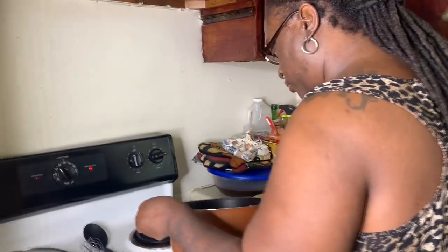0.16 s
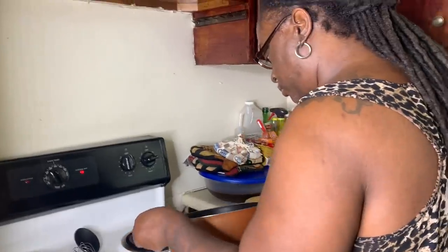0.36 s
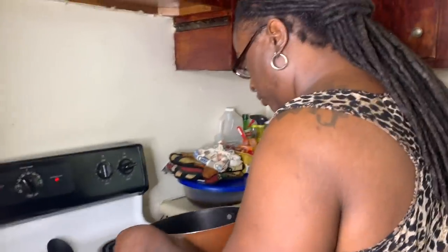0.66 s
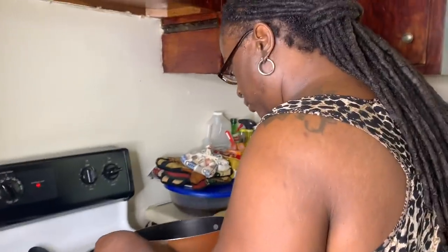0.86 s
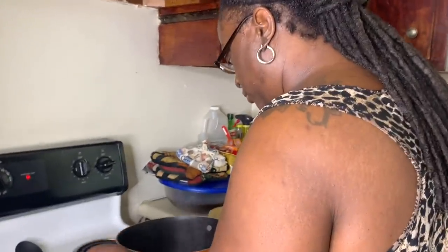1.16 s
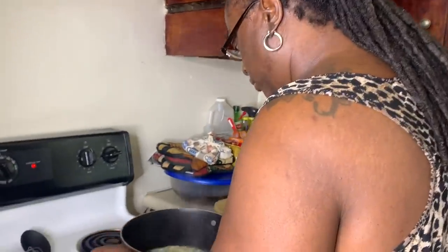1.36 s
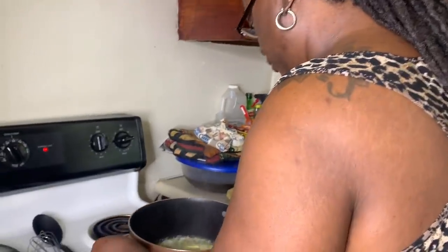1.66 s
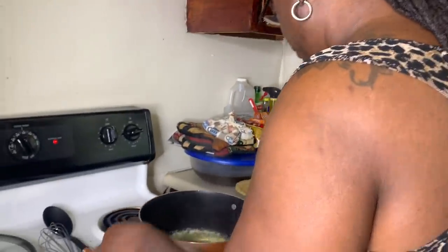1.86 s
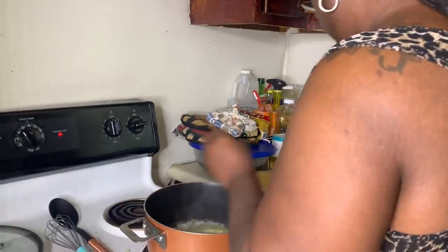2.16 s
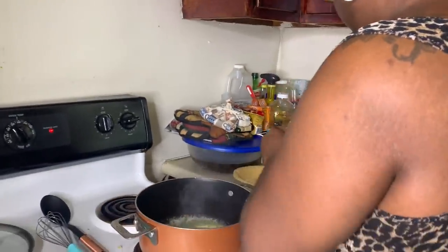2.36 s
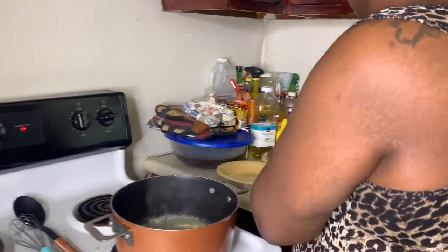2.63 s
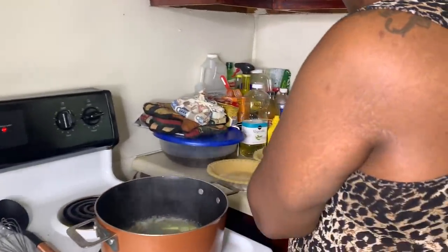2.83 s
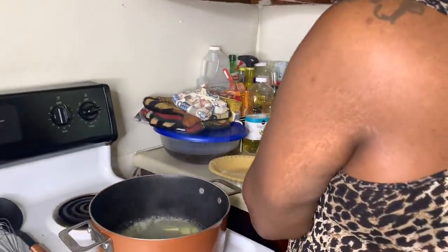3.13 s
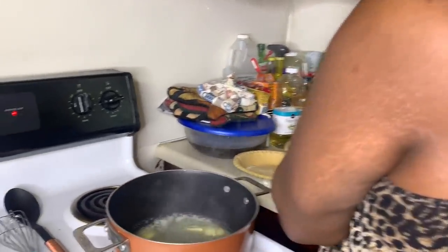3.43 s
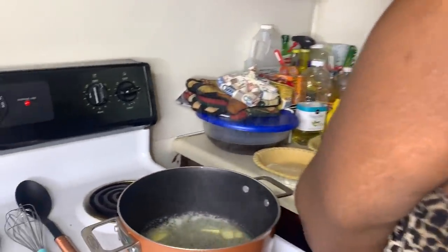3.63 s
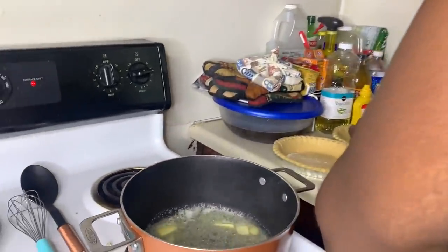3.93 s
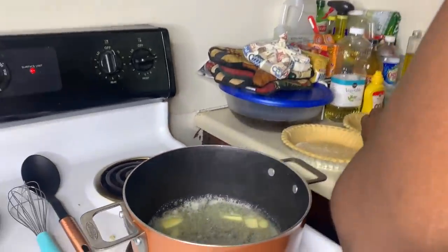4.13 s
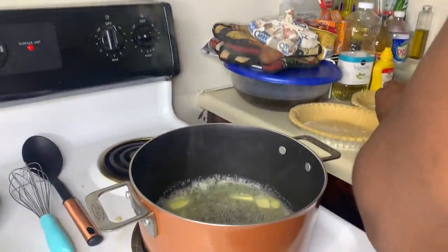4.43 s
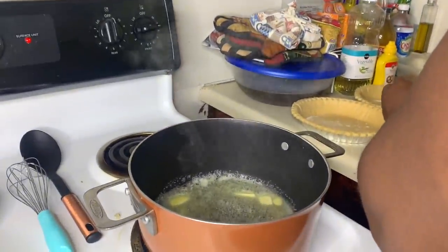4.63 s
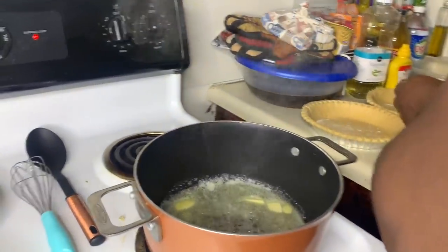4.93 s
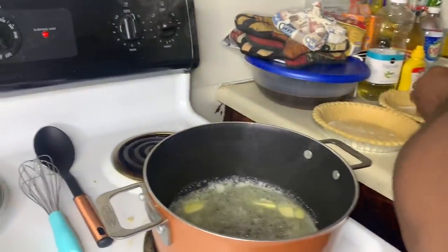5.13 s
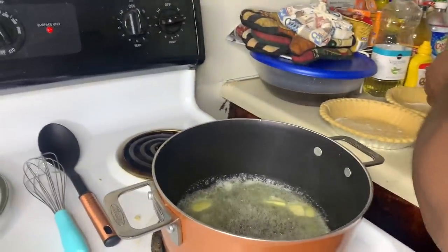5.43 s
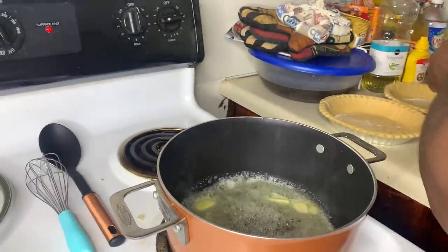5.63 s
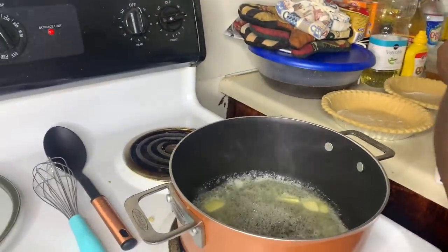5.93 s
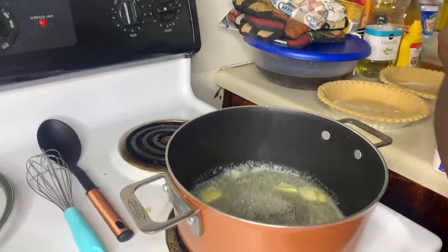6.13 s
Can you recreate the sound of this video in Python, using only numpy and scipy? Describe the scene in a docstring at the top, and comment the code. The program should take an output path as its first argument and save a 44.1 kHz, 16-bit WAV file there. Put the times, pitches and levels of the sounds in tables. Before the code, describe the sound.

Butter sizzles throughout, a dense bright hiss of tiny bubbles with a hollow ringing from the pot, over low appliance hum and soft air rush in a small kitchen. At first the hiss is slightly coarser, building and settling by about 1 second. At 1.4 a utensil touches the stove top, then lands harder at 1.5 with a woody, metallic knock and short low panel note. A tiny tap comes near 2.6, faint dull ticks around 3.8 to 4.25. From roughly 4 seconds the pot seems closer: individual crackles stand out and a low burble grows. At 4.5 a hard dish clatters sharply onto the counter, ringing bright for about a tenth of a second. At 5.0 a lighter object rattles down, duller and quieter. Small ticks at 5.2, 5.65, 5.8 and 6.1 mingle with spitting bubbles, the strongest at 6.0, until it stops near 6.3.

```python
"""Butter sizzling on a kitchen stove

Butter foams in a pot on an electric stove in a small kitchen, an arm's length from a microphone pair.
Tiny steam bubbles are random clicks coloured to a hiss; coarser ones ring the pot, and larger ones spit.
A utensil on the stove top, then a dish and a lighter thing on the counter, are struck resonances.
Appliance hum is wavering sines over low noise."""
import sys
import numpy as np
from scipy import signal
from scipy.fft import rfft, irfft, next_fast_len
from scipy.io import wavfile
from scipy.ndimage import uniform_filter1d

SR = 44100
rng = np.random.default_rng(int(sys.argv[2]) if len(sys.argv) > 2 else 0)


def wrap_up_sound(samples):
    """Save the sound to the file named by the first command line argument, as 16-bit audio."""
    columns = np.atleast_2d(samples).T
    # keep every value between -1 and 1, then stretch to whole-number steps
    tamed = np.clip(columns, -1, 1)
    steps = np.round(tamed * 32767).astype(np.int16)
    wavfile.write(sys.argv[1], SR, steps)


N = 276927
TIME = np.arange(N) / SR
SLOW_TIME = TIME[::256]  # coarse steps for slow changes
FFT_SIZE = 2 * next_fast_len(N // 2 + 2048)  # room for filter tails
FFT_HZ = np.fft.rfftfreq(FFT_SIZE, 1 / SR)


def gain_of(db):
    """Turns decibels into an amplitude factor."""
    return 10 ** (np.asarray(db) / 20)


def evened(x):
    """Scales to an rms of 1."""
    return x / np.sqrt(np.mean(x ** 2) + 1e-20)


def read(points, hz):
    """Reads a spectrum table, joined on a log-frequency axis."""
    f, value = np.transpose(points)
    return np.interp(np.log(hz + 1), np.log(f + 1), value)


def follow(rows, t):
    """Reads a two-column curve table at the times t."""
    s, value = np.transpose(rows)
    return np.interp(t, s, value)


def add(mix, s, sound):
    """Places a sound at s seconds, cut at the end of the mix."""
    part = mix[:, round(s * SR):][:, :sound.shape[-1]]
    part += sound[..., :part.shape[1]]


def drift(t, rate):
    """Chance drift of rms 1: sines of random phase, slower ones stronger, up to rate cycles a second."""
    total = 0
    for f in rate * np.geomspace(1 / 10, 1, 12):
        total = total + np.sin(2 * np.pi * (f * t + rng.random())) / np.sqrt(f)
    return evened(total)


def causal(db):
    """The minimum-phase response with this gain, which rings only after the blow."""
    log_gain = np.log(gain_of(np.r_[db, db[-2:0:-1]]))
    return np.exp(np.conj(signal.hilbert(log_gain)))[:len(db)]


# closeness to the stove as the cook steps aside, 0 afar and 1 close: (time [s], closeness [share])
CLOSENESS = [(0, 0.11), (3.3, 0.032), (4.3, 1.06), (5.2, 0.97), (5.7, 1.22), (6.28, 1.1)]


def near_gain(far_db, near_db):
    """The gain of a layer that changes by near_db as closeness goes from 0 to 1."""
    return gain_of(far_db + near_db * follow(CLOSENESS, TIME))


# likeness of the left and right ports: (frequency [Hz], correlation)
PORT_LIKENESS = [(60, 0.6), (250, 0.97), (500, 0.68), (800, 0.1), (1100, .6), (1400, 0.39), (2000, 0.05),
                 (2800, 0.34), (4000, 0.28), (5300, 0.25), (6400, 0.47), (7300, 0.083), (8800, 0.56),
                 (10200, 0.95), (13400, 1)]
# level of the left port over the right: (frequency [Hz], difference [dB])
PORT_BALANCE = [(200, 0), (700, -0.5), (1400, -2), (2500, 0.6), (3400, 1.3), (4700, -2), (5750, -5.5),
                (7600, -0.3), (8300, -4.5), (10000, -0.5), (13000, 0)]
# phase lead of the left port: (frequency [Hz], lead [rad])
PORT_LEAD = [(60, 0), (600, -.35), (950, .8), (1400, .55), (2000, -.3), (2800, 1.7), (3900, .65), (5300, 2),
             (6200, .4), (6900, .8), (7700, -1.6), (8700, -3.1), (10200, -6.3), (11900, -9.4),
             (14700, -15.3)]


def ports(z, hz):
    """Two unrelated spectra become a microphone pair: partly alike, one port ahead of the other."""
    same = np.clip(read(PORT_LIKENESS, hz), -1, 1)
    mid = z[0] * np.sqrt((1 + same) / 2)
    side = z[1] * np.sqrt((1 - same) / 2)
    # each port takes half the difference
    lean = gain_of(read(PORT_BALANCE, hz) / 2) * np.exp(.5j * read(PORT_LEAD, hz))
    return np.array([(mid + side) * lean, (mid - side) / lean])


def coloured(x, spectrum):
    """Two signals pass through a spectrum and reach the microphone pair at rms 1."""
    response = causal(read(spectrum, FFT_HZ))
    return evened(irfft(ports(rfft(x, FFT_SIZE), FFT_HZ) * response)[:, :N])


def bursts(per_s, spread_db):
    """Bubble bursts are single-sample clicks at random moments, most small and a few large."""
    size = gain_of(spread_db * np.minimum(rng.exponential(1, N), 4))
    happens = rng.random(N) < per_s / SR
    sign = rng.choice([-1., 1.], (2, N))
    return evened(sign * rng.random((2, N)) * size * happens)


# appliance hum from mains and motors, under the room:
# (frequency [Hz], rms level afar [dB], gain close to the stove [dB], waver [dB rms])
HUM_TONES = [(58.8, -51, 3.5, -0.3), (118.9, -55.5, 0, 2.5), (141.9, -51.5, 1, 1.7), (277.2, -60, -1, 1.5),
             (447, -58.5, -7, 3), (656, -69.5, -16, 2)]
# colour of the low rush of air: (frequency [Hz], relative density [dB per Hz])
AIR_SPECTRUM = [(20, -35), (45, -2), (60, -10), (80, -6), (105, -4), (150, 1), (270, -1), (370, -6.5),
                (450, -3), (650, -11), (800, -15), (1400, -18), (3000, -31.5), (15000, -49)]
# level of that rush at the microphone: (time [s], level [dB])
AIR_LEVEL = [(0, -48), (0.8, -48.5), (2.0, -48.5), (2.8, -49.5), (3.25, -51), (3.8, -49.5), (4.4, -50),
             (4.8, -52.5), (5.15, -49), (5.7, -47.5), (6.28, -50.5)]


def kitchen(wander_turns=0.073):
    """Mains and motors hum as sines of drifting phase and level, over a low rush of air from noise."""
    hum = 0
    for hz, far_db, near_db, waver_db in HUM_TONES:
        # the second tone wanders by wander_turns, the others in proportion to pitch
        wander = wander_turns * hz / HUM_TONES[1][0]
        turns = hz * TIME + wander * np.interp(TIME, SLOW_TIME, drift(SLOW_TIME, rate=3))
        waver = gain_of(waver_db * np.interp(TIME, SLOW_TIME, drift(SLOW_TIME, rate=13)))
        hum = hum + np.sqrt(2) * near_gain(far_db, near_db) * waver * np.sin(2 * np.pi * turns)
    air = coloured(rng.standard_normal((2, N)), AIR_SPECTRUM)
    return hum + gain_of(follow(AIR_LEVEL, TIME)) * air


# bursting bubbles as the pot colours them: (frequency [Hz], relative density [dB per Hz])
FOAM_SPECTRUM = [(300, -18), (1300, -20), (1900, -14.5), (2400, -7), (3000, -2), (3750, 1), (4400, 0.5),
                 (5100, -4), (6300, -5), (7800, -8), (8300, -4), (9700, -9), (12000, -11), (13500, -15.5),
                 (14500, -22)]
# single bubbles against the dense hiss: (level afar [dB], gain close to the stove [dB])
CRACKLE_LEVEL = (-16.5, 12.5)
# treble of the hiss, before its weight by frequency: (time [s], level [dB])
HISS_TREBLE = [(0, 7), (0.7, 10), (1.3, 3), (1.65, 0), (2.45, -3.5), (2.85, 1), (3.25, -4.5), (3.65, 1.5),
               (6.28, -1.5)]
# middle range of the hiss, in full from 3.8 to 6.5 kHz: (time [s], level [dB])
HISS_MIDDLE = [(0, -0.5), (0.7, 0.1), (1.4, -0.5), (2.3, 1.6), (2.9, -2), (3.7, 0.5), (4.3, -0.1),
               (4.9, -.7), (5.5, 1), (6.28, -2.1)]
# the boil builds up at first, then holds
BOIL_DB, BUILD_DB, BUILD_S = -37.5, 7.5, 0.78
# the share of coarse bubbles falls steadily as the butter heats (before its weight by frequency)
COARSE_DB, COARSE_FALL_DB_PER_S = 2.0, 1.26
# the young foam is coarser still, until it settles
YOUNG_DB, SETTLE_AT_S, SETTLE_TAKES_S = 2.5, 0.98, 0.08


def sizzle(patchy_db=1.0, ripple_db=2.0, flutter_db=0.54):
    """A dense foam of bursts plus nearer single ones; the balance of bands shifts as the butter heats."""
    foam = bursts(per_s=30000, spread_db=0.5)
    single = bursts(per_s=900, spread_db=2.5)
    clear = near_gain(*CRACKLE_LEVEL)
    hiss = coloured((foam + clear * single) / np.sqrt(1 + clear ** 2), FOAM_SPECTRUM)
    hz, t, z = signal.stft(hiss, SR, nperseg=512, noverlap=384)

    boil_db = BOIL_DB - BUILD_DB * np.exp(-t / BUILD_S)
    young = (1 - np.tanh((t - SETTLE_AT_S) / SETTLE_TAKES_S)) / 2
    coarse_db = COARSE_DB - COARSE_FALL_DB_PER_S * t + YOUNG_DB * young
    # weights: how strongly each frequency follows each band's curve
    coarse = read([(2700, 0.57), (4200, 0.033)], hz)[:, None]
    middle = read([(2500, 0), (3800, 1), (6500, 1), (8500, 0)], hz)[:, None]
    fine = read([(7500, 0.14), (12500, 0.77)], hz)[:, None]
    bands_db = coarse * coarse_db + middle * follow(HISS_MIDDLE, t) + fine * follow(HISS_TREBLE, t)

    # bubbles of like size burst in small clusters
    patches = uniform_filter1d(rng.standard_normal(z.shape[1:]), size=10, axis=0)
    patches = evened(uniform_filter1d(patches, size=12, axis=1))
    # echoes from the pot wall and the kitchen leave narrow peaks, which drift by chance
    ripple = evened(uniform_filter1d(rng.standard_normal(z.shape[1:]), size=70, axis=1))
    chance_db = patchy_db * patches + ripple_db * ripple + flutter_db * drift(t, rate=16)
    z = z * gain_of(boil_db + bands_db + chance_db)
    return signal.istft(z, SR, nperseg=512, noverlap=384)[1][:, :N]


def resonate(x, hz, width):
    """A steep resonance of gain 1 that follows the curve hz: shift to 0 Hz, low-pass, shift back."""
    turn = np.exp(2j * np.pi * np.cumsum(hz) / SR)
    r = np.exp(-np.pi * width * np.sqrt(2) / SR)
    return 2 * (turn * signal.lfilter([(1 - r) ** 2], [1, -2 * r, r * r], x / turn)).real


# resonances of the air in the pot and of the pot itself, before the whole ring is levelled:
# (frequency [Hz], width [Hz], level afar [dB], gain close to the stove [dB])
HOLLOW_MODES = [(1070, 60, 1.5, 1.5), (1177, 70, -7.5, 8), (1493, 52, -7.5, 8.5), (1645, 55, 5, -4),
                (1932, 67, 7, -2.5), (2170, 270, 1, -4), (2530, 195, 6.5, -19)]
# level of the whole ring at the microphone: (time [s], level [dB])
HOLLOW_LEVEL = [(0, -54.5), (1.8, -54), (3.1, -57), (3.9, -54.5), (4.3, -51), (4.8, -55), (5.3, -52.5),
                (5.7, -51), (6.28, -53)]
POT_SHIFT, POT_WANDER = .015, 0.023  # pitch rise close to the stove and rms chance drift [share]


def hollow():
    """Coarse bursts ring the pot; its modes shift and trade strength as the microphone moves over the rim."""
    drive = coloured(bursts(per_s=1000, spread_db=2), [(1000, 0), (3000, 0)])  # flat colour
    near, out = follow(CLOSENESS, TIME), 0
    for hz, width, far_db, near_db in HOLLOW_MODES:
        wander = np.interp(TIME, SLOW_TIME, drift(SLOW_TIME, rate=2.14))
        pitch = hz * (1 + POT_SHIFT * near + POT_WANDER * wander)
        out = out + gain_of(far_db + near_db * near) * resonate(drive, pitch, width)
    return gain_of(follow(HOLLOW_LEVEL, TIME)) * evened(out)


# low resonances of the melted butter: (frequency [Hz], width [Hz], relative level [dB])
BUTTER_MODES = [(156, 5.2, -8), (203.6, 12.2, 1), (237, 15.4, -3), (266.1, 9.9, -5.5)]
# the burble grows as the pot comes near: (level afar [dB], gain close to the stove [dB])
BUTTER_LEVEL = (-57.5, 8.7)


def burble():
    """Sparse coarse bursts ring narrow low resonances in the butter, louder close to the stove."""
    drive = rfft(bursts(per_s=300, spread_db=2.5), FFT_SIZE)
    response = sum(gain_of(db) / (1 + 1.3j * (FFT_HZ - f) / width) ** 2 for f, width, db in BUTTER_MODES)
    return near_gain(*BUTTER_LEVEL) * evened(irfft(ports(drive, FFT_HZ) * response)[:, :N])


def knocks(rows, body, modes, room_db, room_t60, grain_db, note_q, click_db=-24):
    """Each contact is a click, a short note and a rattle; with their echo they ring the body and its modes."""
    out, size = np.zeros((2, N)), 24576
    t, hz = np.arange(size) / SR, np.fft.rfftfreq(size, 1 / SR)
    ring = 1 + sum((gain_of(db) - 1) / (1 + 2j * (hz - f) / width) for f, width, db in modes)
    octaves = np.log2(np.maximum(hz, 1500) / 1500)  # brightness tilts only what lies above 1500 Hz
    for s, db, bright, rattle_s, pitch_hz, note_db in rows:
        # the spot that is struck sets the pitch
        note = gain_of(note_db) / (1 + 1.3j * note_q * (hz / pitch_hz - 1)) ** 2
        colour = causal(read(body, hz) + bright * octaves) * ring
        # the rattle is noise whose level jumps every 32 samples
        grain = gain_of(grain_db * np.repeat(rng.standard_normal(size // 32), 32))
        contacts = rng.standard_normal((2, size)) * grain
        rattle = evened(contacts * (1 - np.exp(-t / 0.0011)) * np.exp(-t / rattle_s))
        echo_shape = (1 - np.exp(-t / 0.0049)) * gain_of(-60 * t / room_t60)
        echo = evened(rng.standard_normal((2, size)) * echo_shape)
        scatter = rfft(rattle) + gain_of(room_db) * (1 + note / 2) * rfft(echo)
        blow = gain_of(click_db) + note + ports(scatter, hz) / np.sqrt(size)
        # the row's level sets the energy of the whole knock
        add(out, s, gain_of(db) * evened(irfft(blow * colour)) / np.sqrt(size))
    return out


# contacts of a utensil on the stove top: (time [s], energy level [dB],
# brightness [dB per octave], rattle decay [s], note pitch [Hz], note over rattle [dB])
UTENSIL_CONTACTS = [(1.4228, -9.5, 2, 0.0037, 1150, 1), (1.4262, -2, 0.5, 0.018, 970, 4),
                    (1.4290, -8, 5, .004, 1850, 8), (1.5038, -2.5, 3.5, 0.0046, 1170, 6),
                    (1.5082, 0.5, 2.5, 0.0047, 1000, 7), (1.5175, -2, 0, 0.012, 2180, -1),
                    (1.5295, -7, -2, 0.007, 580, 5), (1.5475, -12, -9, 0.0072, 2700, 0),
                    (1.5665, -15, -6, 0.013, 544, 15)]
# broad body of the stove top: (frequency [Hz], gain [dB])
STOVE_TOP_BODY = [(30, -22), (60, -2), (200, -4), (330, 1), (430, -4), (540, -1.5), (660, -0.5), (780, 0),
                  (1000, -0.5), (1450, -8), (2200, -4.5), (4000, -8.5), (7000, -17.5), (15000, -34)]
# modes of the stove top: (frequency [Hz], width [Hz], gain [dB])
STOVE_TOP_MODES = [(523, 8, 12), (658, 25, 9), (1124, 25, 7), (1841, 22, 5), (2130, 110, 7), (2850, 45, 8)]


def utensil_on_stove():
    """A utensil set down on the stove top rings its body and modes in quick contacts."""
    return knocks(UTENSIL_CONTACTS, STOVE_TOP_BODY, STOVE_TOP_MODES,
                  room_db=1, room_t60=0.43, grain_db=2.0, note_q=8.3)


# low notes of the stove's sheet metal and the cupboards, levels at the right port before the soft onset:
# (time [s], level [dB], pitch [Hz], 60 dB decay [s])
PANEL_NOTES = [(1.5072, -15.5, 656, 0.039), (1.5105, -24.5, 521.6, 0.24), (1.521, -33.5, 69.5, 0.36),
               (1.531, -30, 566, 0.061), (1.536, -31.5, 141, 0.2), (1.5673, -25.5, 523, 0.13),
               (4.247, -25, 262, 0.076), (4.246, -26, 187, 0.08), (4.636, -29, 334, 0.045),
               (4.637, -31, 460, 0.045), (4.644, -41, 87, 0.25), (1.606, -36, 93, .25)]


def bumps(rise_s=0.0043, left_db=-3.0):
    """Large panels answer a push with one low, short note: a decaying sine, softer at the left port."""
    out, t = np.zeros((2, N)), np.arange(SR // 2) / SR
    for s, db, hz, t60 in PANEL_NOTES:
        envelope = gain_of(db - 60 * t / t60) * (1 - np.exp(-t / rise_s))
        add(out, s, envelope * np.sin(2 * np.pi * hz * t))
    return out * gain_of([[left_db], [0]])


# small dull taps and ticks of handling: (time [s], energy level [dB],
# brightness [dB per octave], rattle decay [s], note pitch [Hz], note over rattle [dB])
HANDLING_CONTACTS = [(2.6095, -17, 3, 0.0077, 2200, 14), (3.8128, -13, -6, 0.0018, 1510, -2),
                     (3.8175, -14.5, -6, .004, 1880, 4), (3.9325, -15.5, -6, 0.0036, 1590, 6),
                     (4.2373, -13, -9, .004, 1010, 8), (4.2520, -20, -5, 0.009, 1120, 9),
                     (5.2045, -13, 2.5, 0.0065, 1720, 7), (5.6515, -9, 9, 0.015, 6100, -3),
                     (5.8140, -10.5, 3, 0.0055, 2050, 4), (5.9783, -18, 2, 0.0039, 2270, 11),
                     (6.0816, -9.5, 2, 0.002, 2250, 11), (6.0865, -11.5, 1, 0.002, 1390, 10)]
# broad body of the tapped things: (frequency [Hz], gain [dB])
HANDLING_BODY = [(100, -13), (500, -5.5), (750, -8), (1200, -2.5), (2200, -2.5), (4000, -8), (7000, -12),
                 (15000, -28)]


def handling_taps():
    """Small taps sound a broad body without modes, with a short, grainy scatter."""
    return knocks(HANDLING_CONTACTS, HANDLING_BODY, [],
                  room_db=1.5, room_t60=0.13, grain_db=8.0, note_q=6.9)


# larger bubbles that spit in the pot: (time [s], envelope peak [dB], pitch [Hz])
SPIT_BUBBLES = [(3.692, -31, 4870), (4.465, -30, 4200), (5.0148, -25, 4840), (5.0222, -31, 3600),
                (5.2635, -27, 4260), (5.6485, -30, 5400), (5.9205, -27, 4800), (6.0084, -20, 3860),
                (6.061, -29, 4300), (6.2045, -29, 4700)]


def spits(ring_s=0.00042, splash_db=-17, splash_s=0.0028):
    """A large bubble snaps in a few cycles, and the pot wall scatters it as a short noise."""
    out, t = np.zeros((2, N)), np.arange(2048) / SR
    for s, db, hz in SPIT_BUBBLES:
        envelope = (t / ring_s) * np.exp(1 - t / ring_s)
        snap = np.sin(2 * np.pi * (hz * t + rng.random((2, 1)) / 4)) * envelope
        # a gentle band-pass that removes the lowest and highest noise
        noise = signal.lfilter([1, 0, -1], [2], rng.standard_normal((2, len(t))))
        splash = noise * np.exp(-t / splash_s)
        add(out, s, gain_of(db) * (snap + gain_of(splash_db) * splash))
    return out


# contacts of a hard dish clattering onto the counter: (time [s], energy level [dB],
# brightness [dB per octave], rattle decay [s], note pitch [Hz], note over rattle [dB])
DISH_CONTACTS = [(4.4888, -1.5, -0.5, 0.0039, 1140, 5), (4.4953, 1, 0.5, 0.005, 1700, 8.5),
                 (4.5050, -2, -1.5, 0.0069, 1770, 3), (4.5155, 1, -1.5, .003, 1910, 12),
                 (4.5217, 4, 0, 0.004, 4230, 0), (4.5222, -8, 4, .003, 1970, 17),
                 (4.5250, 1.5, 2, 0.007, 4130, 5), (4.5288, -5, -1, .003, 1960, 8),
                 (4.5365, -5, 4, 0.0045, 4030, 3), (4.5485, -4, -3.5, 0.007, 2100, -1),
                 (4.5745, -8, 0.5, .012, 520, 10), (4.5910, -7.5, 0.5, 0.011, 1200, -8)]
# broad body of dish and counter, shared by the lighter thing: (frequency [Hz], gain [dB])
COUNTER_BODY = [(100, -12), (330, -14.5), (490, 1.5), (650, -12), (850, -4.5), (1300, -2.5), (1800, -4),
                (2600, -1), (4000, -2), (6500, -6), (10000, -7.5), (15000, -19)]
# modes of the dish: (frequency [Hz], width [Hz], gain [dB])
DISH_MODES = [(1690, 24, 7), (1840, 16, 8), (1962, 17, 10), (2139, 18, 11), (2373, 20, 5), (3260, 24, 6),
              (3720, 36, 7), (3840, 32, 5), (4075, 36, 5), (4210, 36, 8), (5170, 36, 9), (5290, 32, 7),
              (6230, 36, 7), (8000, 42, 8)]


def dish_on_counter():
    """A hard dish clatters onto the counter and rings many narrow modes."""
    return knocks(DISH_CONTACTS, COUNTER_BODY, DISH_MODES,
                  room_db=-2.5, room_t60=0.25, grain_db=1.2, note_q=6.5)


# contacts of a lighter thing, perhaps a lid, set down after the dish: (time [s], energy level [dB],
# brightness [dB per octave], rattle decay [s], note pitch [Hz], note over rattle [dB])
LID_CONTACTS = [(5.0150, -12, 0, .005, 1420, 6), (5.0215, -7.5, 0, .014, 2900, 4),
                (5.0430, -6, 0.5, 0.0074, 1440, 6), (5.0538, -3, -1, 0.0022, 1690, 11),
                (5.0580, -1.5, 0.5, 0.004, 1670, 5), (5.0650, -6.5, -3, 0.0039, 1870, 7),
                (5.0765, -11, 3, .003, 1500, 4), (5.0885, -21, -1, .004, 3700, 4)]
# modes of the lighter thing: (frequency [Hz], width [Hz], gain [dB])
LIGHT_LID_MODES = [(537, 36, 6.8), (740, 36, 15), (1540, 31, 11), (1714, 37, 8.1), (1820, 21, 4.8),
                   (1980, 56, 14), (2720, 110, 4.6), (3120, 130, 6.3)]


def lid_on_counter():
    """A lighter thing clatters onto the counter, its modes fewer and mostly wider than the dish's."""
    return knocks(LID_CONTACTS, COUNTER_BODY, LIGHT_LID_MODES,
                  room_db=-3.5, room_t60=0.37, grain_db=3.5, note_q=8.1)


def scene():
    """The kitchen's hum, the pot and the handling around it."""
    pot = sizzle() + hollow() + burble() + spits()
    handling = utensil_on_stove() + bumps() + handling_taps() + dish_on_counter() + lid_on_counter()
    return kitchen() + pot + handling


def record(dry, edge_hz=14750):
    """The recorder's band limit, a linear-phase low-pass."""
    low_pass = signal.firwin(255, edge_hz, window=("kaiser", 9), fs=SR)
    return signal.oaconvolve(dry, low_pass[None], "same")


dry = scene()
out = record(dry)
wrap_up_sound(out)
```